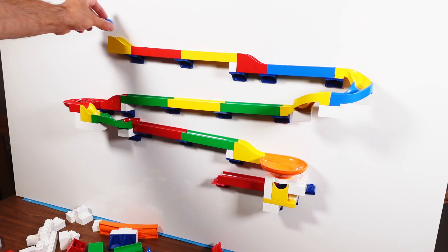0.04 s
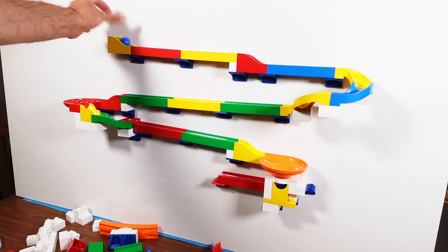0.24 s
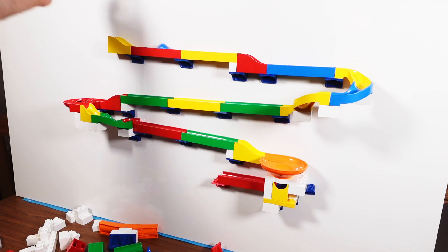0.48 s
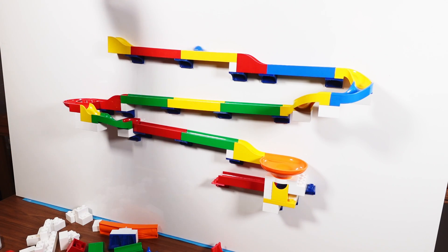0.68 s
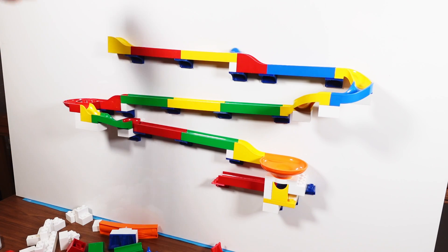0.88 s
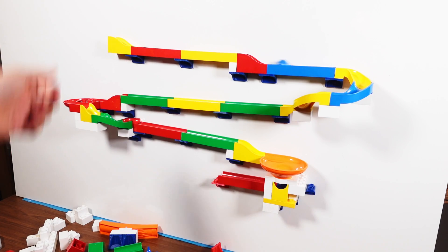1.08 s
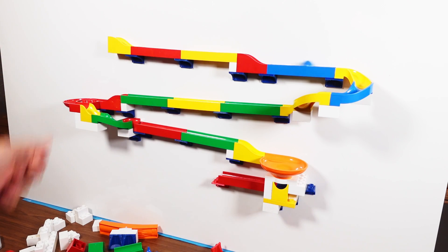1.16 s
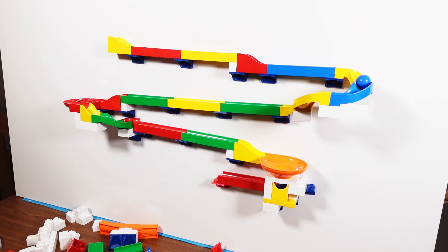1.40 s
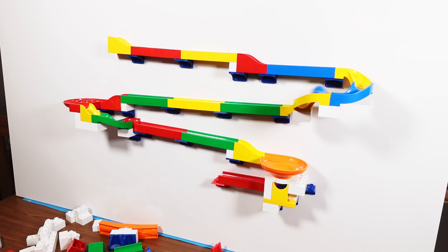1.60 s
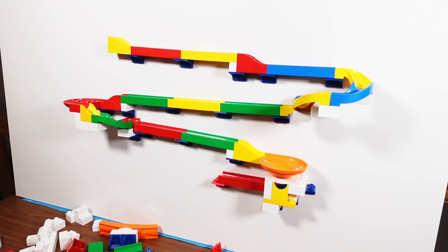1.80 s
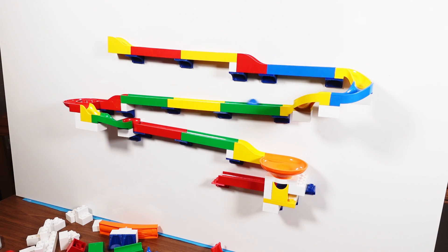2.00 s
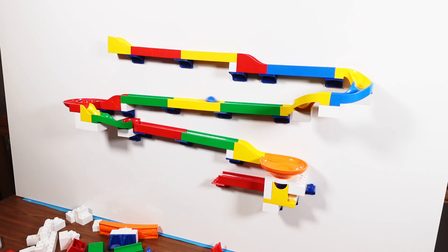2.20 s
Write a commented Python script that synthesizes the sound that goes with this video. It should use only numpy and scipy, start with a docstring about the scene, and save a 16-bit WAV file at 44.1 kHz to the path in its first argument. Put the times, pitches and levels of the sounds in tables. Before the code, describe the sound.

A glass marble rolls down a plastic track over a faint room hum. At about 0.2 seconds it lands with three quick, sharp clicks, then rolls with a light, hollow rumble, ticking over the joints. From 1.3 to 1.9 seconds it clacks and rattles through a curve, then rolls on more quietly until about 2.2 seconds. Each contact rings briefly in the small room.

```python
"""Over a quiet room's hum, a faint high ring sounds as a glass marble leaves the fingers.
It drops into a plastic track, bounces twice and rolls down it, rumbling and ticking over the joints.
It clacks against the walls of a curve, then rolls on along the next straight and grows quieter.
Every contact rings the thin plastic and thumps the hollow supports; the small room answers."""
import sys
import numpy as np
from scipy import signal
from scipy.fft import rfft, irfft, next_fast_len
from scipy.io import wavfile
from scipy.ndimage import map_coordinates

SR = 44100
rng = np.random.default_rng(int(sys.argv[2]) if len(sys.argv) > 2 else 0)


def generate_wav(signal):
    """Clip the signal to [-1, 1] and save it as 16-bit WAV at the path in sys.argv[1]."""
    frames = np.transpose(np.atleast_2d(signal))
    scaled = np.clip(frames, -1, 1) * 32767
    pcm = np.round(scaled).astype(np.int16)
    wavfile.write(sys.argv[1], SR, pcm)


N = 99225

# The clear modes of the plastic track: pitch_hz, level_db, t60_s
TRACK_MODES = [(355.4, -9, 0.11), (417, -6, 0.11), (797, -12.5, 0.11), (1381, -4, .08), (1716, -4, 0.1),
               (2110, -18.5, 0.1), (2523, -8, 0.06), (2910, 4.5, 0.049), (3243, 1.5, 0.039),
               (4313, -6.5, 0.045), (5294, -7, 0.029), (7100, -1, 0.014), (7730, -11.5, 0.038),
               (10130, 0, 0.0083)]
TOP_HZ, RING_SAMPLES = 16000, 2 ** 13
BUMPS_PER_S, JUDDER_PER_S = 900, 35
CONTACT_WET_DB = -6.5


def amp(db):
    """Decibels to gain."""
    return 10 ** (np.asarray(db) / 20)


def unit(x):
    """Scale to rms 1."""
    return x / np.sqrt(np.mean(x ** 2) + 1e-20)


def unit_hit(x, window_s=0.014):
    """Give a short sound the energy of window_s at rms 1."""
    return x * np.sqrt(window_s * SR) / np.linalg.norm(x)


def curve_at(points, hz):
    """Read (frequency_hz, value) points on a log frequency axis."""
    point_hz, values = np.transpose(points)
    return np.interp(np.log(hz + 1), np.log(point_hz + 1), values)


def add(out, start_s, x):
    """Mix x into out from start_s."""
    part = out[max(round(start_s * SR), 0):][:len(x)]
    part += x[:len(part)]


def equalise(x, points):
    """Minimum-phase EQ through (frequency_hz, gain_db) points."""
    size = 2 * next_fast_len(len(x))
    gain = amp(curve_at(points, np.fft.rfftfreq(size, 1 / SR)))
    cepstrum = irfft(np.log(gain))
    cepstrum[1:size // 2] *= 2
    cepstrum[size // 2 + 1:] = 0
    return irfft(rfft(x, size) * np.exp(rfft(cepstrum)))[:len(x)]


def resonate(x, resonances, order=1):
    """Pass x through a bank of (pitch_hz, width_hz, gain_db) resonances, order times over."""
    size = next_fast_len(len(x) + RING_SAMPLES)
    f = np.fft.rfftfreq(size, 1 / SR)
    body = sum((-1) ** k * amp(db) * 1j * f * width / (hz * hz - f * f + 1j * f * width)
               for k, (hz, width, db) in enumerate(resonances))
    return irfft(rfft(x, size) * body ** order, size)[:len(x)]


def decay(t, t60_s):
    """Fall by 60 dB every t60_s."""
    return np.exp(-np.log(1000) * t / t60_s)


def dying_noise(t60_points, size):
    """Noise in which each frequency dies at its own speed."""
    hz, t, spectrum = signal.stft(rng.standard_normal(size), SR, nperseg=128)
    spectrum = spectrum * decay(t, curve_at(t60_points, hz)[:, None])
    return signal.istft(spectrum, SR, nperseg=128)[1][:size]


def judder(depth_db):
    """A smooth random gain that makes the roll flutter."""
    knots = rng.standard_normal(N // 100)
    return amp(depth_db * map_coordinates(knots, [np.arange(N) * JUDDER_PER_S / SR], mode="wrap"))


def bumps(scatter_db):
    """Tiny random impacts of uneven size under the rolling marble."""
    impulses = (rng.random(N) < BUMPS_PER_S / SR) * np.sign(rng.standard_normal(N))
    return impulses * amp(scatter_db * np.clip(rng.standard_normal(N), -2, 2))


def room_hum(level_db=-61.5):
    """The quiet room: steady noise, heaviest in the bass."""
    # Spectrum of the hum: frequency_hz, gain_db
    hum_eq = [(12, -5), (20, -8.5), (38, -12.5), (193, -19), (228, -17), (328, -21.5), (2990, -37),
              (12100, -39.5), (16000, -42)]
    return amp(level_db) * unit(equalise(rng.standard_normal(N), hum_eq))


def release(start_s=0.139):
    """Two faint high partials ring as the marble leaves the fingers."""
    out, t = np.zeros(N), np.arange(RING_SAMPLES) / SR
    partials = amp(-68) * np.sin(2 * np.pi * 6234 * t) + amp(-62.5) * np.sin(2 * np.pi * 7025 * t)
    add(out, start_s, partials * decay(t, t60_s=0.22))
    return out


def track_hum(fade_s=0.023):
    """Each piece of track hums at its own resonances while the marble crosses it."""
    # Resonances of the pieces: start_s, end_s, pitch_hz, width_hz, level_db
    piece_tones = [(.215, 0.367, 345.6, 69, -36), (.222, 0.333, 2513, 140, -38.5),
                   (0.251, .52, 109, 14, -55.5), (0.438, 0.721, 874, 60, -48),
                   (0.432, 0.728, 1408, 72, -47.5), (0.731, 0.94, 717, 83, -49),
                   (0.752, 1.05, 1293, 38, -55.5), (1.056, 1.296, 846, 55, -46.5),
                   (1.066, 1.326, 344, 35, -50), (1.077, 1.294, 1415, 51, -47),
                   (1.385, 1.496, 393, 60, -40), (1.398, 1.98, 196.4, 11.5, -54),
                   (1.546, 1.7, 330, 11.6, -42), (1.559, 1.69, 895, 13, -48), (1.713, 1.798, 350, 51, -46),
                   (1.72, 1.818, 840, 43, -41.5), (1.938, 2.142, 149, 11.3, -52),
                   (1.899, 2.235, 1401, 59, -50)]
    out = np.zeros(N)
    drive = bumps(scatter_db=2) * judder(depth_db=4)
    for start_s, end_s, pitch_hz, width_hz, level_db in piece_tones:
        t = np.arange(int((end_s - start_s) * SR)) / SR
        contact = np.clip(np.minimum(t, t[::-1]) / fade_s, 0, 1)
        stretch = np.roll(drive, rng.integers(N))[:len(t) + RING_SAMPLES]
        hum = resonate(stretch, [(pitch_hz, width_hz, 0)], order=2)[RING_SAMPLES:]  # skip the build-up
        add(out, start_s, amp(level_db) * unit(hum) * contact)
    return out


def clack(favoured_hz, favour_db=11, favour_octaves=0.09, scatter_db=2, rise_cycles=3.9):
    """Glass hits plastic: clear modes, boosted near favoured_hz, and stray glints over a clatter."""
    # Spectrum of the clatter, a crowd of weaker modes: frequency_hz, gain_db
    clatter_eq = [(60, -17.5), (150, -7), (280, -2), (600, -5.5), (1050, -5), (1700, 0.5), (3000, 2.5),
                  (3800, -2), (6000, -4), (10000, -6.5), (12000, -7), (15500, -18.5)]
    # Ring time of that crowd: frequency_hz, t60_s
    clatter_t60 = [(200, 0.14), (1000, 0.12), (3000, 0.041), (8000, .024), (15000, 0.034)]
    t = np.arange(RING_SAMPLES) / SR
    ring = np.zeros(RING_SAMPLES)
    for pitch_hz, level_db, t60_s in TRACK_MODES:
        detune, size, phase = rng.standard_normal(3)
        boost_db = favour_db * np.exp(-(np.log2(pitch_hz / favoured_hz) / favour_octaves) ** 2)
        detuned_hz = pitch_hz * (1 + 0.012 * detune)  # pieces of track differ a little in pitch
        partial = np.sin(2 * np.pi * (detuned_hz * t + phase))
        rise = 1 - np.exp(-t * pitch_hz / rise_cycles)  # low modes build up slowly
        ring += amp(level_db + boost_db + scatter_db * size) * partial * decay(t, t60_s) * rise
    glint_hz = rng.uniform(2200, 10000, size=(7, 1))  # high modes, new at every contact
    glint_phase = rng.random((7, 1))
    glints = np.sin(2 * np.pi * (glint_hz * t + glint_phase)).sum(axis=0) * decay(t, t60_s=0.058)
    attack = 1 - np.exp(-t / 0.00056)
    clatter = equalise(dying_noise(clatter_t60, RING_SAMPLES) * attack, clatter_eq)
    return amp(-2) * unit_hit(ring) + amp(-9.5) * unit_hit(glints) + amp(2) * unit_hit(clatter)


def knocks():
    """Bounces, joints and wall hits; each spot has its own mix of thump, ring and crack."""
    # Hits on the track; the three tone columns count against their own averages:
    # start_s, level_db, thump_db, ring_db, crack_db, favoured_hz
    track_hits = [(0.22, -30.5, -1, 10, 1.5, 2520.0), (0.25, -27, -11.5, 4, 7.5, 3600),
                  (0.2765, -28, -3.5, 3.5, 0, 3030), (0.4741, -39.5, -13.5, -3, -5.5, 1400),
                  (0.5941, -45.5, -6.5, 7.5, -13.5, 1380), (0.6511, -41, 0.5, -0.5, -9.5, 1390.0),
                  (1.0425, -40.5, -6, -6, -13, 1410), (1.155, -37.5, 1.5, -11.5, -12, 1400),
                  (1.3118, -37.5, -5, 8, -1.5, 1710), (1.3385, -35, -15, -1, -6.5, 1800),
                  (1.3867, -27, -8.5, 1.5, 3, 1800), (1.403, -39.5, 0, 3.5, 8, 2800),
                  (1.4189, -28.5, -12, -2.5, -4, 2930), (1.4582, -41.5, 7, 10, 1.5, 2870),
                  (1.5617, -31.5, -9, -0.5, -1, 2110.0), (1.623, -41, -1.5, 9.5, -4, 2900),
                  (1.713, -43.5, -8.5, 6, 5.5, 1680), (1.7312, -29, -1.5, 3, 1, 2890.0),
                  (1.8835, -27.5, -2, -2, -3.5, 1570), (1.937, -36.5, -9.5, -1.5, -5, 1390)]
    out = np.zeros(N)
    average_tone_db = np.mean(track_hits, axis=0)[2:-1]
    for start_s, level_db, *tone_db, favoured_hz in track_hits:
        thump_db, ring_db, crack_db = np.array(tone_db) - average_tone_db
        hit_eq = [(500, thump_db - 1), (1100, 0), (2000, 0), (2500, ring_db - 2), (3200, ring_db - 2),
                  (4200, crack_db - 6), (7000, crack_db - 3)]
        hit = amp(level_db) * equalise(clack(favoured_hz), hit_eq)
        add(out, start_s, in_room(hit, CONTACT_WET_DB))
    return out


def in_room(x, wet_db, rise_s=0.01):
    """Add the small room's answer, a fresh short tail on every call."""
    # Reverb time of the room: frequency_hz, t60_s
    tail_t60 = [(100, 0.37), (400, 0.32), (2000, 0.31), (6000, 0.34), (15000, 0.19)]
    # Colour of the reverb: frequency_hz, gain_db
    tail_eq = [(100, 5.5), (350, 5.5), (900, 5), (1800, 1), (4000, -0.5), (8000, -6), (15000, 1)]
    t = np.arange(SR // 2) / SR
    swell = 1 - np.exp(-(t / rise_s) ** 2)
    tail = equalise(dying_noise(tail_t60, len(t)) * swell, tail_eq)
    response = amp(wet_db) * tail / np.linalg.norm(tail)
    response[0] += 1  # the direct sound
    return signal.fftconvolve(x, response)


def specks(per_s=3500, scatter_db=2):
    """Grit under the marble: tiny pings, each with its own pitch and size."""
    t = np.arange(SR // 140) / SR
    when, pitch, size, phase = rng.random((int(per_s * N / SR), 4)).T[..., None]
    gain = amp(scatter_db * np.minimum(-np.log(size), 3))
    pings = gain * np.sin(2 * np.pi * (pitch * TOP_HZ * t + phase)) * decay(t, t60_s=0.009)
    positions = (when * N).astype(int) + np.arange(len(t))
    return np.bincount(positions.ravel(), pings.ravel(), N)[:N]


def rolling(rumble_trim_db=-4, trim_db=-3):
    """Tiny bumps drive the track's resonances; grit adds treble, most on landing and in the curve."""
    # Fader moves of the roll, before the trims: time_s, rumble_db, grit_db
    roll_faders = [(.24, -75, -102), (0.309, -36.5, -38), (.42, -46, -66.5), (.49, -42.5, -55),
                   (.58, -47, -65), (.68, -40, -52.5), (.75, -43.5, -63), (.92, -44, -65.5),
                   (1.03, -45.5, -69), (1.1, -38.5, -54.5), (1.29, -40.5, -58.5), (1.43, -32, -43),
                   (1.53, -48, -49), (1.69, -39.5, -49), (1.76, -43, -54), (1.85, -32, -41.5),
                   (1.92, -38.5, -48), (2.05, -41, -65.5), (2.25, -49, -66)]
    # Resonances heard through the whole roll: pitch_hz, width_hz, gain_db
    body_resonances = [(171, 50, -13), (335.5, 68, -2.5), (495, 42, -4), (642, 89, -11.5), (796, 153, -2.5),
                       (1343, 66, -1), (1688, 290, -12.5), (2080, 67, -8), (3130, 120, -35.5)]
    # Broad bed of rumble under them: frequency_hz, gain_db
    bed_eq = [(40, -56), (130, -2.5), (260, -1.5), (340, 1.5), (600, 0.5), (1050, 1.5), (1600, 0.5),
              (2200, -4.5), (3500, -11), (8000, -43)]
    # Colour of the grit: frequency_hz, gain_db
    grit_eq = [(800, -18), (2000, 8.5), (3100, 1.5), (3900, -19), (5000, 3.5), (8000, -3.5), (13000, -7.5),
               (16000, -15)]
    time_s, rumble_db, grit_db = np.transpose(roll_faders)
    t = np.arange(N) / SR
    flutter = judder(depth_db=1.5)
    body = unit(resonate(bumps(scatter_db=1.5) * flutter, body_resonances))
    bed = unit(equalise(bumps(scatter_db=5.5) * flutter, bed_eq))
    grit = unit(equalise(specks() * flutter, grit_eq))
    rumble_gain = amp(np.interp(t, time_s, rumble_db, left=-120) + rumble_trim_db)
    grit_gain = amp(np.interp(t, time_s, grit_db))
    roll = rumble_gain * (body + amp(-2.5) * bed) + grit_gain * grit
    return in_room(roll, wet_db=-5)[:N] * amp(trim_db)


def ticks(trim_db=-14.5):
    """The marble skips lightly on seams and specks, each tick favouring a random upper mode."""
    # Light skips, before trim and EQ: start_s, level_db, treble_db
    skips = [(0.444, -36, -54), (0.5473, -33.5, -55), (0.6367, -31, -47), (0.665, -28, -51),
             (0.7624, -33.5, -50), (0.85, -39, -55), (0.9606, -44, -59), (0.9867, -38, -63),
             (1.0626, -33.5, -48), (1.0962, -26.5, -45), (1.1657, -26.5, -39.5), (1.2133, -31.5, -44.5),
             (1.2417, -35, -48), (1.2734, -45, -45), (1.2867, -28, -51), (1.7492, -40, -36),
             (1.778, -28.5, -40), (1.8153, -31, -39), (2.0072, -34.5, -48.5), (2.1133, -41, -52.5),
             (2.1974, -39.5, -58)]
    out = np.zeros(N)
    upper_modes_hz = [hz for hz, _, _ in TRACK_MODES if hz > 1000]
    average_tilt_db = np.mean([treble_db - level_db for _, level_db, treble_db in skips])
    for start_s, level_db, treble_db in skips:
        brightness_db = treble_db - level_db - average_tilt_db
        tick_eq = [(200, -24.5), (1400, 5), (3000, -3), (6000, brightness_db - 6)]
        tick = equalise(clack(rng.choice(upper_modes_hz)), tick_eq)
        add(out, start_s, amp(level_db + trim_db) * tick)
    return in_room(out, CONTACT_WET_DB)[:N]


def scene():
    """The marble's run over the room's quiet hum, in mono."""
    background = room_hum()
    contacts = release() + knocks() + ticks()
    roll = rolling() + track_hum()
    return (background + contacts + roll)[None]


def record(dry):
    """A steep low-pass cuts the air above TOP_HZ."""
    return signal.sosfilt(signal.ellip(10, 0.1, 70, TOP_HZ, fs=SR, output="sos"), dry)


dry = scene()
out = record(dry)
generate_wav(out)
```